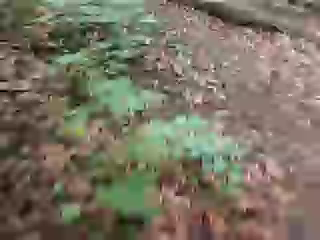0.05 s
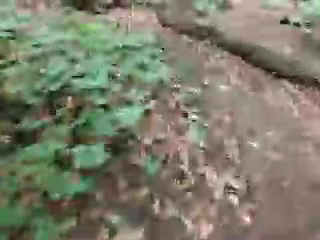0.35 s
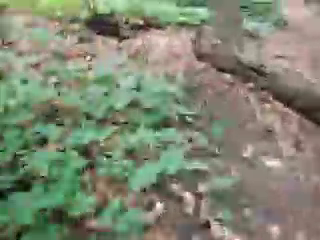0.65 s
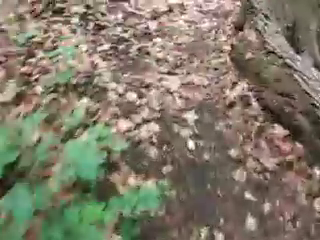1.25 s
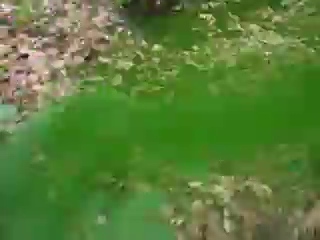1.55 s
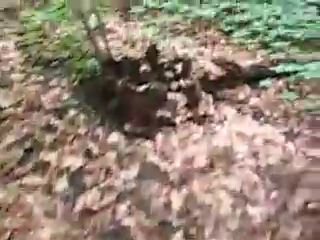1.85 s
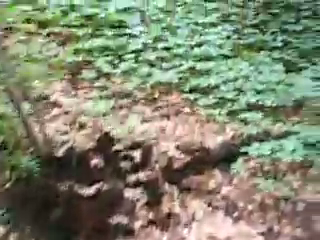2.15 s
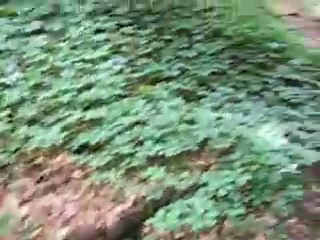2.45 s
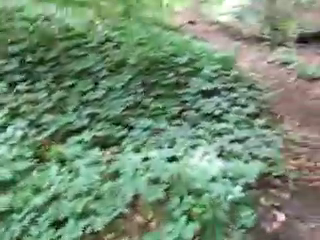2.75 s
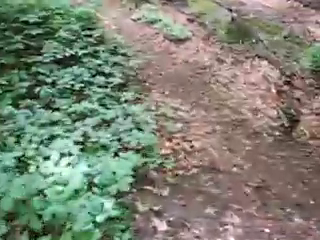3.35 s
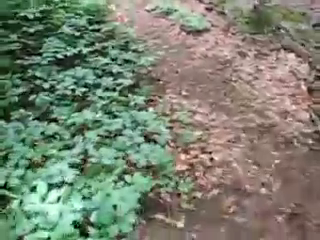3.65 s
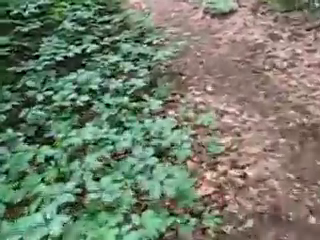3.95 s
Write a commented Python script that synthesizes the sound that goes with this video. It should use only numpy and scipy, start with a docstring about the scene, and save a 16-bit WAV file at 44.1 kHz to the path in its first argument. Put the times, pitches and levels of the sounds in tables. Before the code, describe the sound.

Bicycle tyres crackle over dry leaves while gusts of wind buffet the microphone.

```python
"""A bicycle rolls over dry leaves on a woodland trail, heard from a camera that rides with it.
From the start the tyres crackle and drum, and wind buffets the microphone ports, mostly the left.
Soon plants swish past, twigs snap and the frame knocks over bumps. A faint whine fades in, a stem
rasps along the wheel, and at 1.5 s a leafy branch slaps across the camera. Near 2.8 s a spoke pings,
and towards the end the wind rises again."""
import sys
import numpy as np
from scipy import signal
from scipy.fft import rfft, irfft
from scipy.io import wavfile
from scipy.ndimage import uniform_filter1d, map_coordinates

SR = 44100
rng = np.random.default_rng(int(sys.argv[2]) if len(sys.argv) > 2 else 0)


def store_wav(level_fs):
    """Save 16-bit WAV to argv[1]."""
    pcm = np.round(np.clip(np.atleast_2d(level_fs), -1, 1) * 32767)
    wavfile.write(sys.argv[1], SR, pcm.T.astype(np.int16))


N = 176400
T = np.arange(N) / SR
BAND_LIMIT_HZ = 15850

# Leaf crackle and soil rumble under the tyres. Each row: time in seconds, level in dB.
CRACKLE_LEVELS = [(0, -46.5), (.35, -45), (.78, -40), (1.05, -36.5), (1.2, -35), (1.5, -36), (1.62, -37.5),
                  (1.68, -49), (1.85, -45.5), (2.02, -41), (2.07, -35), (2.24, -36), (2.37, -42),
                  (2.5, -37.5), (2.66, -42.5), (2.76, -38), (3.05, -43), (3.28, -40), (3.46, -46.5),
                  (3.53, -42), (4, -44)]
RUMBLE_LEVELS = [(0, -49.5), (.7, -41.5), (1, -39), (1.22, -32.5), (1.35, -41), (1.5, -40.5), (1.68, -52),
                 (1.82, -46.5), (2.1, -45.5), (2.85, -42.5), (3.2, -46), (3.7, -40.5), (4, -44)]
# Drumming of the tread. Each row: time in seconds, pitch in Hz, level in dB.
TREAD_DRUM = [(0, 99.7, -59), (1.4, 95.5, -41), (1.7, 78.2, -61), (2, 74.2, -46), (2.3, 75.7, -48.5),
              (2.55, 78.5, -37.5), (2.8, 82.3, -51)]
# Spectra of the noise sources. Each row: frequency in Hz, relative spectral density in dB.
LEAF_SPECTRUM = [(200, -22.5), (700, -5), (1500, -1), (7300, 0), (9200, -8.5), (12000, -12.5),
                 (15500, -19.5)]
SOIL_SPECTRUM = [(25, -1.5), (70, -0.5), (130, -6.5), (215, -8), (310, -2), (480, -6), (900, -8),
                 (1600, -13.5), (5000, -36)]
EDDY_SPECTRUM = [(15, -18), (50, -7.5), (135, 1.5), (240, -3), (400, -14.5), (700, -30), (1500, -51.5),
                 (4000, -76)]
SWISH_SPECTRUM = [(300, -28), (1200, -5), (2500, -2.5), (5000, -0.5), (7400, 3.5), (9200, -11.5),
                  (12000, -9.5), (15500, -25)]
SCRAPE_SPECTRUM = [(200, 3), (650, 1.5), (1300, -1), (2800, -4), (5000, 2), (7200, -2.5), (9000, -11),
                   (11500, -1), (15500, -14.5)]
THUMP_SPECTRUM = [(60, -4), (180, 2), (550, -5), (900, -9), (2000, -37), (6000, -42)]
# Top treble of the trail sounds, duller on bare soil. Each row: time in seconds, boost in dB.
TREBLE_BOOST = [(1.3, 2.5), (3.4, 0)]
# Likeness of the two ports. Each row: frequency in Hz, coherence from 0 to 1.
PORT_COHERENCE = [(100, 1), (800, 0.84), (2000, 0.63), (4000, 0)]
# Responses of the left port, then the right. Each row: frequency in Hz, gain in dB.
PORT_RESPONSES = [
    [(1500, -0.5), (3000, -1), (6000, -1), (9000, -7), (11500, 2), (14000, -2.5)],
    [(1500, -1), (3000, 1), (5800, -1), (7800, 3.5), (11500, -6.5), (15000, -3)],
]
# Wind at each port. Each row: time in seconds, level in dB.
LEFT_WIND_LEVELS = [(0, -22), (.1, -15.5), (.35, -14), (.45, -18), (.585, -22), (.61, -13.5), (.745, -14.5),
                    (.765, -42), (1.07, -41), (1.095, -15.5), (1.125, -24), (1.15, -9), (1.18, -16),
                    (1.205, -43), (1.8, -54), (2.11, -47.5), (2.17, -28.5), (2.42, -42.5), (2.765, -43),
                    (2.8, -25.5), (3.3, -38.5), (3.65, -24.5), (3.82, -18.5), (4, -14.5)]
RIGHT_WIND_LEVELS = [(0, -41), (.24, -28), (.72, -34), (.8, -46), (1.1, -33), (1.25, -48.5), (1.8, -57),
                     (2.8, -43), (2.88, -26), (3.05, -31.5), (3.4, -33), (3.8, -25.5), (4, -37.5)]
# Pace of the passing air. Each row: time in seconds, multiple of the usual eddy rate.
AIR_PACE = [(.7, 1.08), (1.15, 0.85), (2.9, 0.63), (4, 0.43)]
# Plants brushing the bicycle, and stems rasping along the wheel.
# Each row: start in seconds, length in seconds, level in dB, spectral tilt in dB per octave.
PLANT_SWISHES = [(0.391, 0.036, -39, 6), (0.725, 0.02, -29, -0.5), (0.842, 0.045, -32.5, 4),
                 (1.092, 0.025, -28.5, 1), (1.268, 0.046, -28.5, 5), (1.334, 0.028, -27, 1),
                 (1.51, 0.062, -28.5, 2.5), (2.04, 0.01, -28, 0.5)]
STEM_RASPS = [(1.391, .024, -22, 3.5), (3.486, 0.016, -29, -2.5)]
# Twigs and grit snapping.
# Each row: start in seconds, level in dB, decay time in seconds, lower and upper band edge in Hz.
TWIG_SNAPS = [(0.475, -29.5, 0.005, 1490, 3380), (1.244, -26, 0.005, 900, 4600),
              (2.4535, -24, 0.0028, 695, 5000), (3.131, -28.5, 0.0041, 605, 2970),
              (3.5665, -22.5, 0.0012, 2100, 4340)]
# Blows to the frame over bumps. Each row: start in seconds, level in dB, factor on the mode frequencies.
FRAME_KNOCKS = [(.795, -37, 1.4), (0.8102, -26.5, 1.13), (1.079, -25, 0.78), (2.402, -39.5, 1.57),
                (3.534, -35, 1), (3.547, -27.5, 0.77), (3.873, -32.5, 0.57), (3.888, -33, 0.83)]
# Normal modes. Each row: frequency in Hz, relative level in dB, time to fall 60 dB in seconds.
FRAME_MODES = [(488, 4, 0.025), (660, 0.5, 0.036), (870, 4, 0.025), (1120, -4, 0.033), (1443, -9, 0.024),
               (2100, -5.5, 0.021)]
SPOKE_MODES = [(8600, 2, 0.057), (10130, -17, .16), (11390, -15.5, 0.38), (11800, -24, .28),
               (11600, -22, .2)]
# Single large eddies. Each row: centre time in seconds, left and right peak in dB.
WIND_BUFFETS = [(1.109, -5, -18), (2.167, -26, -45), (2.872, -22, -19), (3.642, -14.5, -41),
                (3.813, -5, -30)]
# Leaves crossing the camera.
# Each row: start and length in seconds, left and right scrape in dB, left and right thump in dB.
LEAF_SLAPS = [(1.5261, 0.0054, -4.5, -35, -15, -21), (1.533, 0.0065, -9.5, -27, -10, -11),
              (1.54, .016, -17.5, -20, -16.5, -23), (1.558, 0.017, -10, -39, -12, -43),
              (1.571, 0.03, -26, -48, -15, -45), (1.612, 0.012, -19, -43, -29, -53)]
# Stalks tapping the camera. Each row: start in seconds, left and right peak in dB, band centre in Hz.
STALK_TAPS = [(1.5249, -4, -26, 1370), (1.5455, -8, -10.5, 1080), (1.5817, -1, -24, 3600),
              (1.6014, -1.5, -23, 1530)]
# Flicks of a spoke. Each row: start in seconds, gain at the right port in dB.
SPOKE_FLICKS = [(2.781, -22), (2.82, -32)]


def amp(db):
    """Amplitude grows tenfold for every 20 dB."""
    return 10 ** (np.asarray(db) / 20)


def unit(x):
    """Normalisation brings the rms to 1."""
    return x / np.sqrt(np.mean(x ** 2) + 1e-20)


def curve(points, column=1):
    """Linear interpolation gives one column of a time table at every sample."""
    rows = np.array(points)
    return np.interp(T, rows[:, 0], rows[:, column])


def spectrum_at(points, hz):
    """A spectrum is interpolated along a logarithmic frequency axis."""
    table_hz, values = np.transpose(points)
    return np.interp(np.log(hz + 1), np.log(table_hz), values)


def add(mix, start, sound):
    """Superposition: a sound adds to the mix from its start in seconds."""
    part = mix[:, round(start * SR):][:, :sound.shape[-1]]
    part += sound[..., :part.shape[-1]]


def band(x, low_hz, high_hz):
    """A band-pass filter attenuates what lies outside its two edges."""
    return signal.sosfilt(signal.butter(2, [low_hz, high_hz], "band", fs=SR, output="sos"), x)


def colour(x, spectrum, size=4096):
    """Convolution with a minimum-phase impulse response imposes a spectrum causally."""
    log_gain = np.log(amp(spectrum_at(spectrum, abs(np.fft.fftfreq(size, 1 / SR)))))
    transfer = np.exp(np.conj(signal.hilbert(log_gain)))
    response = np.fft.ifft(transfer).real[:size // 2]
    return signal.oaconvolve(np.atleast_2d(x), response[None], axes=1)[:, :N]


def wander(hz, step=100):
    """Low-passed noise fluctuates at rates up to about hz."""
    noise = rng.standard_normal(len(T[::step]))
    rates = np.fft.rfftfreq(len(noise), step / SR)
    slow = irfft(rfft(noise) / (1 + (rates / hz) ** 4), len(noise))
    return unit(np.interp(T, T[::step], slow))


def grains(per_band_per_s, spread_db):
    """Shot noise: tiny fractures, each in one of four bands, reach the two ports with unequal strength."""
    out = np.zeros((2, N))
    edges_hz = np.geomspace(1000, 20000, 5)
    edges_hz[0] = 30
    for low_hz, high_hz in zip(edges_hz, edges_hz[1:]):
        when, rarity, *sides = rng.random((N // 2, 4))[:int(per_band_per_s * N / SR)].T
        size = amp(-spread_db * np.log(rarity + 0.0075))
        clicks = np.array([np.bincount((when * N).astype(int), size * (side - .5), N) for side in sides])
        out += band(unit(clicks), low_hz, high_hz)
    return unit(out)


def stroke(length, rise_s, fall):
    """A brushing contact builds linearly and dies away along a Gaussian."""
    t = T[:SR // 4]
    return np.minimum(t / rise_s, 1) * np.exp(-fall * (t / length) ** 2)


def ring(modes, pitch=1):
    """Free vibration is a sum of damped modes, here with neighbours in opposite phase."""
    t = T[:SR // 3]
    return sum((-1) ** k * amp(db - 60 * t / t60) * np.sin(2 * np.pi * hz * pitch * t)
               for k, (hz, db, t60) in enumerate(modes))


def mottle(x, depth_db=1.58, treble_hz=7300):
    """Time-varying filtering: each leaf briefly favours its own pitches, and a shelf lifts the treble."""
    hz, t, spectra = signal.stft(x, SR, nperseg=256, noverlap=192)
    patches = uniform_filter1d(rng.standard_normal(spectra.shape[1:]), size=3, axis=0)
    patches = uniform_filter1d(patches, size=14, axis=1)
    shelf = 2 * np.clip(hz / treble_hz - 1, 0, .5)[:, None]
    gain_db = depth_db * unit(patches) + shelf * np.interp(t, *np.transpose(TREBLE_BOOST))
    return signal.istft(spectra * amp(gain_db), nperseg=256, noverlap=192)[1][:, :N]


def trail_to_ports(x):
    """Coherence between the ports falls with frequency; each colours the mottled sound in its own way."""
    spectra = rfft(mottle(x))
    coherence = np.clip(spectrum_at(PORT_COHERENCE, np.fft.rfftfreq(N, 1 / SR)), 0, 1)
    angle = np.arcsin(coherence) / 2
    pair = irfft(spectra * np.cos(angle) + spectra[::-1] * np.sin(angle), N)
    return np.vstack([colour(side, port) for side, port in zip(pair, PORT_RESPONSES)])


def tyres(hiss_db=4, clump_db=0.73, jolt_db=2):
    """Rolling contact: leaves fracture in clumps, the soil rumbles and the tread drums a wavering tone."""
    crackle = grains(per_band_per_s=700, spread_db=3) + amp(hiss_db) * rng.standard_normal((2, N))
    crackle *= amp(clump_db * wander(hz=43.5))
    leaves = unit(colour(crackle, LEAF_SPECTRUM)) * amp(curve(CRACKLE_LEVELS))
    jolts = rng.standard_normal((2, N)) * amp(jolt_db * wander(hz=29.3))
    soil = unit(colour(jolts, SOIL_SPECTRUM)) * amp(curve(RUMBLE_LEVELS))
    cycles = np.cumsum(curve(TREAD_DRUM) * (1 + 0.0583 * wander(hz=18))) / SR
    tread = unit(np.sin(2 * np.pi * cycles) * amp(2 * wander(hz=21)))
    return trail_to_ports(leaves + soil) + tread * amp(curve(TREAD_DRUM, column=2))


def wind(levels, pace_per_db=.003, reference_db=-18, suction=.15):
    """Frozen turbulence: a fixed train of eddies passes a port, quicker in gusts, fitful in slow air."""
    db, air_pace = curve(levels), curve(AIR_PACE)
    pace = np.clip(air_pace * np.exp(pace_per_db * (db - reference_db)), .1, 2)
    eddies = unit(colour(rng.standard_normal(N), EDDY_SPECTRUM))[0]
    pressure = map_coordinates(eddies, [np.cumsum(pace)], order=1, mode="mirror")
    pressure /= np.sqrt(abs(uniform_filter1d(pressure ** 2, size=1500)) + 1e-9)  # steadies the rms
    dips = signal.sosfilt(signal.butter(2, 90, "high", fs=SR, output="sos"), pressure ** 2 - 1)
    gust_db = 1.4 * wander(hz=35) / air_pace
    return unit((pressure - suction * dips) * amp(gust_db)) * amp(db)


def plant_strokes(contacts, friction):
    """Sliding friction sounds in short strokes, each passing plant with its own spectral tilt."""
    out = np.zeros((2, N))
    for start, length, db, tilt in contacts:
        envelope = stroke(length, rise_s=0.003, fall=0.92)
        rub = friction[:, round(start * SR):][:, :len(envelope)]
        spectrum = [(hz, density + tilt * np.log2(hz)) for hz, density in SWISH_SPECTRUM]
        swish = unit(colour(rub, spectrum)[:, :rub.shape[1]])
        add(out, start, amp(db) * envelope * swish)
    return out


def twig_snaps():
    """Brittle fracture releases a burst of band-limited noise that decays exponentially."""
    out, t = np.zeros((2, N)), T[:SR // 10]
    for start, db, decay, low_hz, high_hz in TWIG_SNAPS:
        crack = unit(band(rng.standard_normal((2, len(t))), low_hz, high_hz))
        add(out, start, amp(db) * np.exp(-t / decay) * crack)
    return out


def frame_knocks(rattle_db=-18, rattle_s=0.0043):
    """Impact excitation: an impulse and a brief rattle drive the damped modes of the frame."""
    out, t = np.zeros((2, N)), T[:SR // 20]
    for start, db, pitch in FRAME_KNOCKS:
        rattle = amp(rattle_db) * rng.standard_normal(len(t)) * np.exp(-t / rattle_s)
        knock = signal.fftconvolve((t == 0) + rattle, ring(FRAME_MODES, pitch))
        rms = np.sqrt(np.sum(knock ** 2) / (.01 * SR))  # as if all its energy fell within 10 ms
        add(out, start, amp(db) * knock / rms)
    return out


def buffets(usual_width_s=0.0013):
    """A large eddy has a low-pressure core: suction between two swells, longer in slow air."""
    out, t = np.zeros((2, N)), T[:SR // 20]
    middle = t.mean()
    for centre, left, right in WIND_BUFFETS:
        pace = np.interp(centre, *np.transpose(AIR_PACE))
        position = (t - middle) * pace / usual_width_s
        pressure = (position ** 2 - 1) * np.exp(-position ** 2 / 2)
        add(out, centre - middle, amp([[left], [right]]) * pressure)
    return out


def whine(hz=8530, left_db=-68, right_db=-56, start_s=1.2, rise_s=0.92):
    """A faint high tone with slight frequency modulation fades in and stays."""
    tone = unit(np.sin(2 * np.pi * np.cumsum(hz + 4 * wander(hz=14)) / SR))
    return amp([[left_db], [right_db]]) * tone * np.clip((T - start_s) / rise_s, 0, 1)


def stem_rasps(grit, slip_hz=995, waver=0.013, grit_db=7):
    """Stick-slip friction: a stem catches and slips on the wheel in a nearly periodic train of pulses."""
    cycles = np.cumsum(slip_hz * (1 + waver * wander(slip_hz / 10)) / SR)
    slips = np.diff(np.floor(cycles), prepend=0)
    return plant_strokes(STEM_RASPS, unit(slips - slips.mean()) + amp(grit_db) * grit)


def branch(treble_hz=7300, dulling_s=0.056, tap_edge_ratio=1.7):
    """Friction and impact: leaves thump and scrape the ports, duller as they slow, and stalks tap."""
    scrape_gain, thump_gain, taps = np.zeros((3, 2, N))
    for start, length, left, right, thump_left, thump_right in LEAF_SLAPS:
        envelope = stroke(length, rise_s=0.0014, fall=0.91)
        add(scrape_gain, start, amp([[left], [right]]) * envelope)
        add(thump_gain, start, amp([[thump_left], [thump_right]]) * envelope)
    for start, left, right, hz in STALK_TAPS:
        tap = band(signal.unit_impulse(SR // 20), hz / tap_edge_ratio, hz * tap_edge_ratio)
        add(taps, start, amp([[left], [right]]) * tap / abs(tap).max())
    friction = unit(colour(grains(per_band_per_s=6000, spread_db=2.5), SCRAPE_SPECTRUM))
    treble = signal.sosfiltfilt(signal.butter(3, treble_hz, "high", fs=SR, output="sos"), friction)
    lost_share = np.clip((T - LEAF_SLAPS[0][0]) / dulling_s, 0, 0.89)
    thump = unit(colour(rng.standard_normal((2, N)), THUMP_SPECTRUM))
    return scrape_gain * (friction - lost_share * treble) + thump_gain * thump + taps


def spoke_pings(tick_s=0.0012, left_offset_db=-11):
    """A flicked spoke gives a bright transient, then rings freely in its normal modes."""
    out, t = np.zeros((2, N)), T[:SR // 20]
    for start, db in SPOKE_FLICKS:
        tick = unit(band(rng.standard_normal(len(t)), 5000, BAND_LIMIT_HZ)) * np.exp(-t / tick_s)
        for part in (tick, ring(SPOKE_MODES)):
            add(out, start, amp([[db + left_offset_db], [db]]) * part)
    return out


def scene():
    """The pressures of all sources superpose at the left and right ports."""
    rolling = tyres()
    grit = grains(per_band_per_s=2500, spread_db=2)
    plants = trail_to_ports(plant_strokes(PLANT_SWISHES, grit) + stem_rasps(grit) + twig_snaps())
    ride = rolling + plants + frame_knocks() + spoke_pings() + branch() + whine()
    return ride + buffets() + np.array([wind(LEFT_WIND_LEVELS), wind(RIGHT_WIND_LEVELS)])


def record(dry):
    """Overload clips the peaks at full scale; a low-pass filter then limits the bandwidth."""
    low_pass = signal.firwin(511, BAND_LIMIT_HZ, window=("kaiser", 9), fs=SR)
    return signal.oaconvolve(np.clip(dry, -1, 1), low_pass[None], "same", axes=1)


dry = scene()
out = record(dry)
store_wav(out)
```